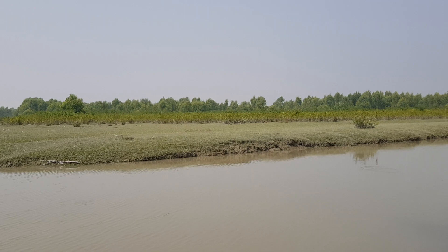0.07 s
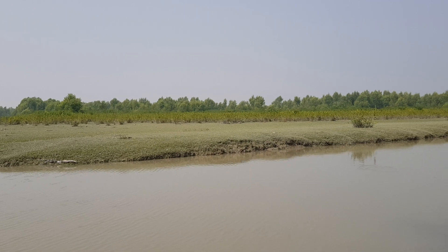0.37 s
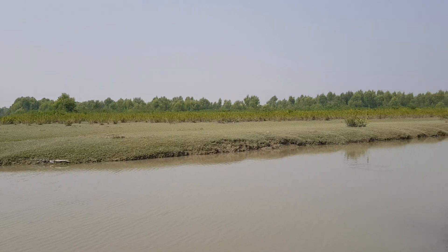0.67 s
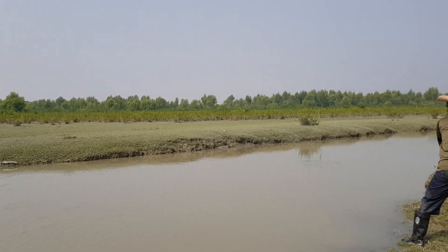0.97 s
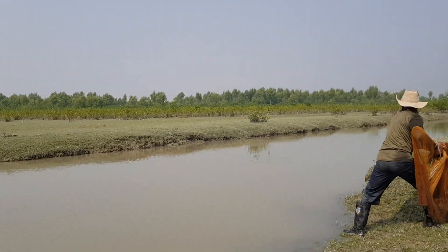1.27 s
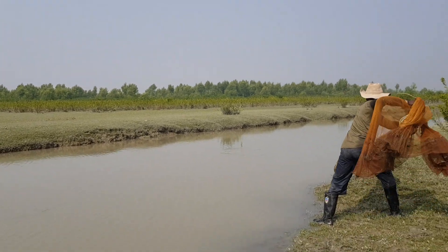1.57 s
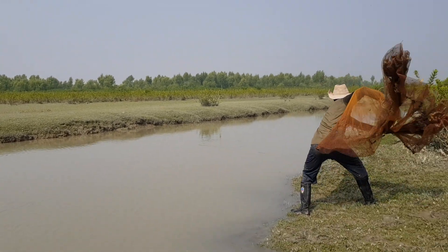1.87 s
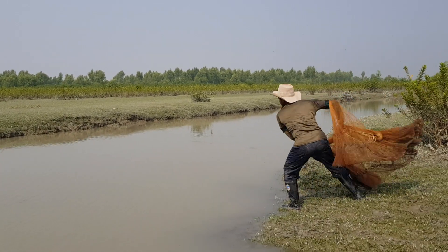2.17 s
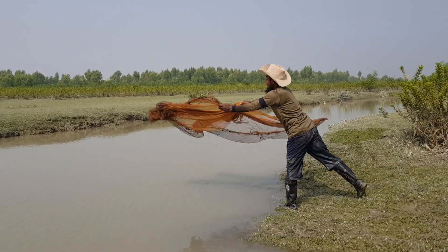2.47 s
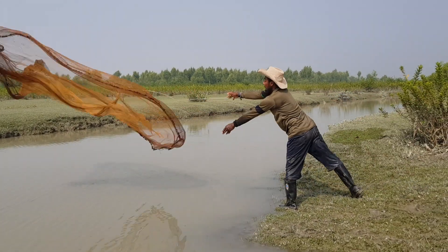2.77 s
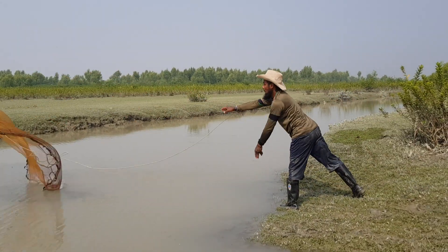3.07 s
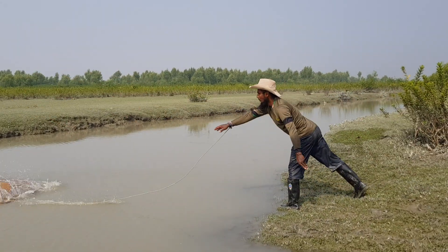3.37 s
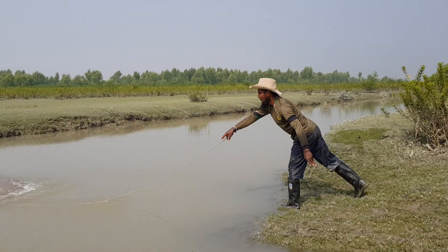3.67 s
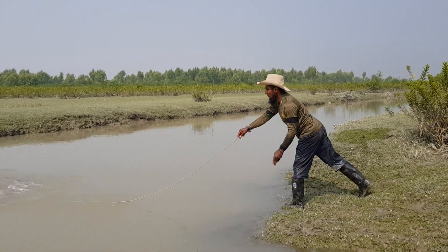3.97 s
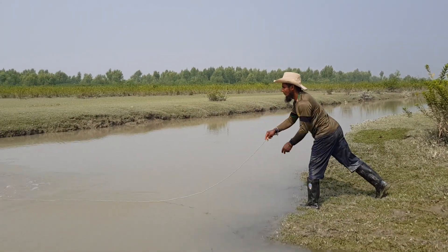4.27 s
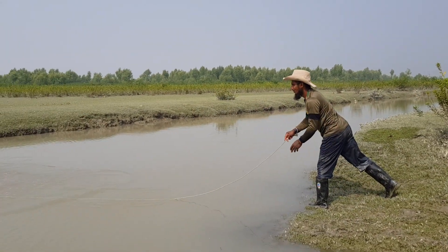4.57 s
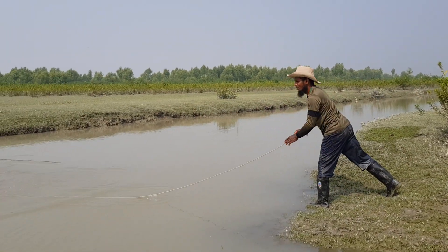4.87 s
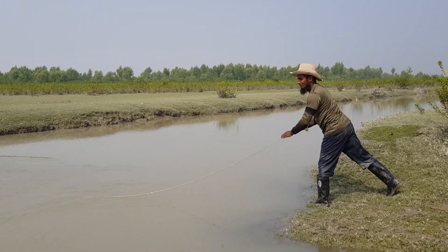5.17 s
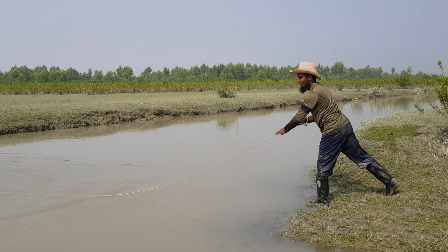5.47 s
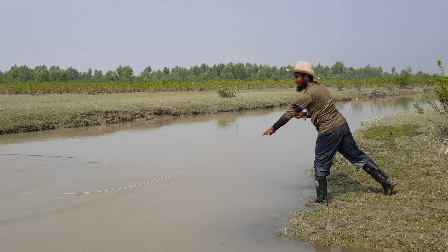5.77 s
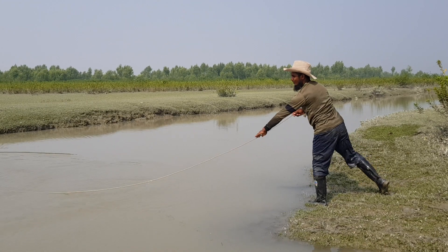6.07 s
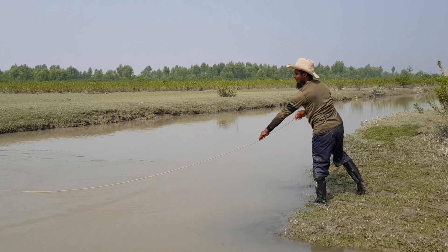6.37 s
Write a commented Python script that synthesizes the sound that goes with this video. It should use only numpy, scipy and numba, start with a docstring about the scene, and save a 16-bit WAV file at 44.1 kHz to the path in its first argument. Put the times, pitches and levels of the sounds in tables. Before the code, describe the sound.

High crickets chirp on both sides throughout, over the faint, even thudding of a distant boat engine and low wind rumble on the microphone. From about 1.3 seconds the small weights of a cast net click and jingle brightly, and again around 2.1 seconds, with rustling mesh and a few faint squelches of boots in mud. The net swishes through the air from right to left, peaking near 2.5 seconds, with more clicks. At about 3.1 seconds it hits the water in a broad splash of spray, plops and low gulps, strongest around 3.5 seconds. Drops rain back and bubbles fizz, fading by about 4.5 seconds. From 3.8 seconds stronger gusts buffet the microphone, mostly on the right, with a few soft thumps just after 6 seconds. The wind eases near 6.4 seconds, leaving the engine and faint insects.

```python
"""Crickets chirp, a one-cylinder boat engine thuds far off, and wind buffets the microphone.
Then a fisherman on a muddy canal bank swings a cast net: his boots squelch, the sinkers (small weights
on its rim) click together, and the mesh swishes out over the water from right to left.
It lands in a broad splash of spray, gulping air pockets and fizzing bubbles, and the water rains back."""
import sys
import numpy as np
from scipy import signal
from scipy.fft import rfft, irfft, next_fast_len
from scipy.io import wavfile
from scipy.ndimage import map_coordinates
from numba import njit

SR = 44100
rng = np.random.default_rng(int(sys.argv[2]) if len(sys.argv) > 2 else 0)


def master_out(mix):
    """Clip the mix to full scale and print it as 16-bit PCM to the path in sys.argv[1]."""
    frames = np.transpose(np.atleast_2d(mix))
    ceiling = np.clip(frames, -1, 1)
    pcm = np.round(ceiling * 32767).astype(np.int16)
    wavfile.write(sys.argv[1], SR, pcm)


N = 292383
TIME = np.arange(N) / SR


# The net's flight. Each row: time in seconds, milliseconds by which the left side hears it first.
NET_FLIGHT = [(2.2, -.15), (2.55, -0.0015), (2.75, .16)]
def net():
    """The net jingles and swishes as it crosses from right to left."""
    speed = net_speed()
    left, right = panned(jingle(speed) + swish(speed), left_db=-1.5)
    _, right = from_side(right, lead_ms=in_time(NET_FLIGHT)[0])
    return np.array([left, right])


def net_speed(swing_s=2.075, let_go_s=2.483, landing_s=3.1):
    """The net grows louder as it speeds up until it is let go, then fades as it slows in the air."""
    speeding_db = 19.5 * np.minimum(TIME - let_go_s, 0)
    slowing_db = -18 * np.maximum(TIME - let_go_s, 0)
    return from_db(speeding_db + slowing_db) * held(swing_s, landing_s, attack=0.0082, release=0.032)


# Sinkers knocking together, and one faint tick of the rope after the splash.
# Each row: start in seconds, ring level in dB, duller clack level in dB.
NET_CLICKS = [(1.3215, -32, -62), (1.398, -20.5, -36), (1.4163, -25, -44), (1.451, -25, -47),
              (1.461, -36, -44), (1.5206, -40, -50), (1.7744, -45, -58), (2.0607, -23.5, -46),
              (2.0684, -29, -48), (2.083, -20, -35), (2.168, -30, -35.5), (2.2762, -38, -40),
              (2.301, -35, -34), (2.3249, -41, -30), (2.53, -30, -45), (2.7126, -29, -30),
              (2.716, -24, -37), (2.8021, -31, -46), (3.1073, -28, -38), (5.1947, -52, -60)]
# The tone of sinkers and mesh. Each row: pitch in Hz, level in dB.
JINGLE_TONE = [(1600, -36), (2400, -15), (3300, -5.5), (6000, -6), (9000, 3), (12000, 5.5), (16000, -12)]
# Mesh dragged through the hands and shaken out. Each row: start and end in seconds, level in dB.
MESH_PULLS = [(1.397, 1.471, -52), (1.765, 1.83, -64), (2.025, 2.053, -60), (2.296, 2.322, -46.5),
              (2.508, 2.546, -52.5), (2.575, 2.67, -63), (2.75, 2.8, -60), (3.041, 3.06, -55)]
def jingle(speed):
    """Sinkers clack and rattle, the mesh rustles in the hands and in the air, and the rope ticks once."""
    clacks = sum(from_db(db) * burst(s, fade_s=.022, attack=.0001) for s, _, db in NET_CLICKS)
    rattles = sum(from_db(db - 26) * burst(s, fade_s=.09, attack=.003) for s, db, _ in NET_CLICKS)
    pulls = sum(from_db(db) * held(start, end, 0.0027, 0.052) for start, end, db in MESH_PULLS)
    rustle = speed ** 0.47 * from_db(-59.5 + 5.1 * drift(45))
    metal = grains(9000, JINGLE_TONE, cycles=5, rise=0, spread_db=1, lead_ms=0, width_ms=.05)
    mesh = grains(2000, JINGLE_TONE, cycles=7, rise=0, spread_db=3.2, lead_ms=0, width_ms=.15)
    sound = click_rings(NET_CLICKS) + clacks * metal + (rattles + pulls + rustle) * mesh
    return filtered(sound, 3, 2200, "high")


def click_rings(hits):
    """Each hit bounces for a few milliseconds, making a dozen short, high rings."""
    s, db, _ = np.repeat(hits, 12, axis=0).T
    pitch, lag = rng.random((len(s), 2)).T
    hz = 7500 + 8000 * pitch ** .8
    sizes = from_db(db - 6 - 4 * lag)  # later bounces are weaker
    rings = pings(s + .005 * lag ** 3, hz, sizes, cycles=30., rise=0., leads=np.zeros_like(s))
    return filtered(rings, 3, 5500, "high")


# The tone of air rushing through the mesh. Each row: pitch in Hz, level in dB.
SWISH_TONE = [(400, 13), (700, -1.5), (1000, 7), (1300, 1.5), (2500, 4), (4000, 0.5), (7000, -4.5),
              (16000, 1)]
def swish(speed):
    """The mesh cuts the air; part of the hiss arrives directly, the rest is scattered."""
    direct = from_db(-2.5) * noise(SWISH_TONE)[0]
    scattered = noise(SWISH_TONE)
    return from_db(-50.5) * speed * rms_one(direct + scattered)


# The tones of spray, plops and small bubbles. Each row: pitch in Hz, level in dB.
SPRAY_TONE = [(1500, -25), (3000, -1), (4500, 4), (6500, 3.5), (10000, 7.5), (13000, 8), (16000, 7)]
PLOP_TONE = [(2200, -3), (2800, -6.5), (3250, 5.5), (3800, 0), (4700, -0.5), (5400, -12), (6200, -7),
             (9000, -11)]
BUBBLE_TONE = [(700, 0.5), (1100, 1.5), (1500, 4.5), (1700, 0.5), (1900, 1.5), (2400, -0.5), (3000, 0),
               (4200, -10), (8000, -37)]
# Water slapping back down. Each row: start in seconds, level in dB.
WATER_SLAPS = [(3.1994, -49), (3.562, -23), (3.579, -23.5), (3.8088, -26), (3.851, -34), (4.0068, -40),
               (4.0597, -45), (4.126, -43.5)]
def splash():
    """The rim of sinkers plops in and tears the surface into spray; trapped air fizzes away."""
    spray = grains(11000, SPRAY_TONE, cycles=5.6, rise=0, spread_db=2, lead_ms=0.332, width_ms=0.062)
    plops = grains(2500, PLOP_TONE, cycles=25, rise=0.053, spread_db=1, lead_ms=0.306, width_ms=0.18)
    bubbles = grains(2500, BUBBLE_TONE, cycles=14, rise=0.29, spread_db=0, lead_ms=0.37, width_ms=0.17)
    spray_gain = landing(-32.5, attack=0.009, release=0.03) + rain_back(-47.5, 11, release=0.42)
    plop_gain = landing(-36.5, attack=0.032, release=0.025) + rain_back(-46, 30, release=0.34)
    bubble_gain = landing(-40.5, attack=0.024, release=0.067) + rain_back(-46, 9.5, release=0.14)
    slaps = sum(from_db(db - 10) * burst(s, fade_s=0.052, attack=0.0015) for s, db in WATER_SLAPS)
    water = air_pockets()
    water += spray_gain * from_db(0.81 * drift(35)) * clustered(spray, depth_db=2, per_s=22)
    water += (plop_gain * from_db(2.2 * drift(30)) + slaps) * clustered(plops, depth_db=3.5, per_s=14)
    water += (bubble_gain + slaps) * clustered(bubbles, depth_db=-0.5, per_s=13)
    return panned(with_bank_echo(water, delay_ms=2, share=.45), left_db=.2)


# Air pockets closing behind the sinkers. Each row: start in seconds, level in dB, first pitch in Hz.
POCKET_GULPS = [(3.209, -32.5, 508), (3.244, -27.5, 587), (3.265, -30, 576), (3.346, -24, 614),
                (3.425, -28, 550), (3.446, -23, 545), (3.488, -32.5, 625), (3.592, -32.5, 454),
                (3.659, -22, 647)]
# The tone of churning water. Each row: pitch in Hz, level in dB.
CHURN_TONE = [(150, -5), (280, -6), (420, -9.5), (590, -0.5), (790, -4.5), (980, -7), (1150, -2.5),
              (1400, -13)]
def air_pockets():
    """Trapped air churns; large pockets gulp, ringing low and rising a little as they near the top."""
    churn = grains(1200, CHURN_TONE, cycles=11, rise=0.14, spread_db=1.5, lead_ms=0.24, width_ms=0.093)
    churn_gain = landing(-37, attack=0.078, release=0.044) + rain_back(-46.5, 10.5, release=0.14)
    gulps = np.zeros(N)
    for s, db, hz in POCKET_GULPS:
        age = TIME - s
        ring = np.sin(2 * np.pi * hz * age * (1 + 2 * age))
        gulps += from_db(db + 3.5) * burst(s, fade_s=0.035, attack=0.0025) * ring
        churn_gain += from_db(db - 13.5) * burst(s, fade_s=0.1, attack=0.0046)
    return churn_gain * churn + from_side(gulps, lead_ms=0.19)


# The first sinkers land, then the near rim, then the rest.
# Each row: start and end in seconds, strength in dB.
LANDING_STAGES = [(3.102, 3.139, -6.5), (3.172, 3.42, -6), (3.42, 3.58, -1)]
def landing(db, attack, release):
    """The loudness of a water sound as the net hits the surface."""
    return sum(from_db(db + strength_db) * held(start, end, attack, release)
               for start, end, strength_db in LANDING_STAGES)


def rain_back(db, fade_db_per_s, release, start_s=3.6, end_s=4.002):
    """The loudness of a water sound as thrown-up water rains back and thins out."""
    faded_db = fade_db_per_s * np.maximum(TIME - start_s, 0)
    return from_db(db - faded_db) * held(start_s, end_s, 0.01, release)


def clustered(x, depth_db, per_s):
    """Clusters of like-sized bubbles come and go, so nearby pitches swell and fade together."""
    hz, s, frames = signal.stft(x, SR, nperseg=512)
    place = np.meshgrid(s * per_s, 6 * np.log2(1 + hz / 600))
    patches = map_coordinates(rng.standard_normal((400, 40)), place, order=1)
    _, sound = signal.istft(frames * from_db(depth_db * patches), SR)
    return rms_one(sound[:, :N])


def with_bank_echo(x, delay_ms, share):
    """A quick, dull bounce off the wet bank strengthens some low pitches and weakens others."""
    late = np.array([delayed(side, delay_ms) for side in x])
    return x + share * filtered(late, 1, 2600, "low")


# Squelches in the mud. Each row: middle in seconds, level in dB, pitch in Hz,
# pitch range as a share of the pitch, length in seconds.
MUD_SQUELCHES = [(1.168, -56.5, 1450, 1.4, 0.0035), (1.75, -61, 977, 0.32, 0.019),
                 (2.14, -49.5, 1430, 0.35, 0.0084), (2.143, -46.5, 1810, 0.084, 0.0064),
                 (2.174, -52.5, 1100, 0.29, .004)]
def boots():
    """Wet mud gives short, hollow squelches under the shifting feet."""
    out = np.zeros(N)
    for s, db, hz, width, length in MUD_SQUELCHES:
        edges_hz = [hz / (1 + width / 2), hz * (1 + width / 2)]
        squelch = filtered(rng.standard_normal(N), 2, edges_hz, "band")
        out += from_db(db) * swell(s, length) * rms_one(squelch)
    return from_side(out, lead_ms=-0.18)


# Gusts of wind. Each row: start and end in seconds, level in dB, how much louder on the left in dB.
WIND_GUSTS = [(0.235, 0.33, -41, -9), (0.74, 1.077, -48, 2), (1.302, 1.59, -39.5, 1),
              (1.709, 2.08, -38.5, 9), (2.49, 2.664, -43, -9), (2.924, 3.03, -41.5, -9),
              (3.425, 3.796, -39.5, -9), (3.805, 4.416, -27.5, -28), (4.441, 4.907, -32, -35),
              (4.931, 5.111, -25.5, -17), (5.17, 5.27, -29, -17), (5.478, 5.944, -38, -3.5),
              (5.741, 5.793, -28, -27), (5.945, 6.35, -28, -31), (6.569, 6.7, -37.5, 21)]
# Sudden swirls of air on the right. Each row: middle in seconds, level in dB, length in seconds.
WIND_SWIRLS = [(3.825, -26.5, 0.0065), (3.975, -31.5, 0.0098), (6.102, -25, 0.02), (6.143, -21, 0.005),
               (6.292, -21.5, 0.014), (6.342, -29.5, 0.012)]
# The tones of gust rumble, flutter, swirls and breeze. Each row: pitch in Hz, level in dB.
RUMBLE_TONE = [(15, -48), (28, -23), (48, 1.5), (70, 2.5), (105, -1.5), (160, -12.5), (250, -21),
               (400, -47.5), (800, -84.5), (2000, -96)]
FLUTTER_TONE = [(40, -14.5), (130, 12.5), (250, -2.5), (400, -18), (700, -48.5), (1500, -59), (3000, -102)]
SWIRL_TONE = [(45, -5), (90, -3), (150, 6.5), (250, -5), (400, -10.5), (700, -35.5), (1200, -57.5),
              (2500, -80)]
BREEZE_TONE = [(20, -24), (35, -1), (55, 1.5), (90, -2.5), (150, -8), (250, -21.5), (450, -46.5)]
def wind(attack=0.0088, release=.012, lull_s=6.36, strong_gust_db=-25):
    """Air rumbles on the microphone; strong gusts add a higher flutter, and swirls thump."""
    breeze = from_db(-43 + 1.2 * drift(21)) * held(-1, lull_s, attack, release)
    gusts = sum(panned(from_db(db) * held(start, end, attack, release), left_db)
                for start, end, db, left_db in WIND_GUSTS)
    pressure = gusts / from_db(strong_gust_db)
    rumble = from_db(-25.5) * pressure ** 0.83
    flutter = from_db(-35.5 + 3.3 * drift(30)) * pressure ** 1.59
    swirls = sum(from_db(db) * swell(s, length) for s, db, length in WIND_SWIRLS)
    return (rumble * noise(RUMBLE_TONE) + flutter * noise(FLUTTER_TONE)
            + swirls * noise(SWIRL_TONE) * [[.05], [1]] + breeze * noise(BREEZE_TONE))


# When the left and the right cricket sing. Each row: start and end in seconds, level in dB.
LEFT_SONG = [(-0.1, 0.34, -48.5), (0.35, 0.7, -56), (0.83, 1.53, -53), (1.68, 2.1, -57), (2.11, 2.98, -52),
             (3.06, 4.28, -55.5), (4.29, 5.45, -54.5), (5.58, 6.37, -56), (6.38, 6.7, -81)]
RIGHT_SONG = [(0.9, 1.65, -60.5), (2.02, 2.96, -63), (3.1, 3.96, -57), (4.3, 5.38, -59), (5.58, 6.7, -67)]
def crickets():
    """One cricket sits in the grass on each side, and more blur together behind them."""
    left = cricket(chirps_per_s=15.4, pitch_hz=8135, sag_hz=140, rasp=.12)
    right = cricket(chirps_per_s=15.9, pitch_hz=8110, sag_hz=110, rasp=.1)
    blur = noise([(7500, -35), (7850, 5), (8080, 17.5), (8280, 10.5), (8600, -34)])
    blur *= from_db(3.8 * drift(45))
    loudness = np.array([sum(from_db(db) * held(start, end, 0.0067, .025) for start, end, db in rows)
                         for rows in (LEFT_SONG, RIGHT_SONG)])
    song = loudness * (np.array([left, right]) + from_db(-7.5) * blur)
    return from_db(-2.5) * song + from_db(-66.5) * blur


def cricket(chirps_per_s, pitch_hz, sag_hz, rasp):
    """Each chirp is two wing strokes and a rest; the pitch sags within every stroke."""
    chirp = (chirps_per_s * TIME + 0.14 * drift(4.8)) % 1
    stroke = 3 * chirp
    loudness = np.sin(np.pi * stroke) ** 2 * (stroke < 2) * from_db(0.82 * drift(56))
    hz = pitch_hz + sag_hz * (.5 - stroke % 1) + 45 * drift(120)
    roughness = 1 + rasp * drift(400)
    return rms_one(loudness * roughness * np.sin(2 * np.pi * np.cumsum(hz) / SR))


# The boat engine's pace. Each row: time in seconds, firings per second.
ENGINE_PACE = [(0, 12.87), (2.8, 12.87), (3.4, 13.1), (4.2, 12.93), (6.63, 12.93)]
# The tones of its thud and its knock. Each row: pitch in Hz, level in dB.
THUD_TONE = [(40, 1), (80, 6.5), (125, 7.5), (175, -4.5), (208, 0), (250, -11), (310, -8.5), (350, -25.5),
             (400, -19), (520, -25), (700, -54.5), (950, -51), (1400, -57), (3000, -56)]
KNOCK_TONE = [(200, 19), (330, 3), (450, 5.5), (560, -5), (720, -24), (1000, -12.5), (1400, -28),
              (3000, -37)]
def engine():
    """Each firing is a dull thud with a knock, followed by the same scatter of echoes off the banks."""
    cycles = np.cumsum(in_time(ENGINE_PACE)[0]) / SR - .39
    firings = np.diff(np.floor(cycles), prepend=-1) * from_db(2 * drift(13))
    scatter = rng.standard_normal((3, SR // 4)) * from_db(-60 * TIME[:SR // 4] / 0.3)
    banks = scatter[0] + .5 * scatter[1:]  # a shared part, plus one for each side
    echoes = signal.fftconvolve(firings[None], banks, axes=1)[:, :N]
    thuds = coloured(firings, THUD_TONE) + from_db(3) * coloured(echoes, THUD_TONE)
    knock_gain = np.exp(-((cycles + .03) % 1) / .1)
    knocks = coloured(knock_gain * rng.standard_normal(N), KNOCK_TONE)
    return panned(from_db(-50.5) * thuds + from_db(-61) * knocks, left_db=2.5)


# The tones of far insects and open air. Each row: pitch in Hz, level in dB.
INSECT_TONE = [(2300, -48), (2600, -7.5), (2800, -0.5), (3150, -14), (4400, -18), (4900, -3.5), (5750, 3.5),
               (6350, -4.5), (6800, 1), (7700, 1), (8600, 5), (9100, -14.5)]
AIR_TONE = [(100, 19), (600, 9), (950, 8), (1300, 2), (2500, 0), (4200, -6.5), (9000, -0.5), (12000, 4.5),
            (16000, 1.5)]
def marsh():
    """Far insects sing on the right, the air hisses softly, and a faint drone sits on the left."""
    insects = from_db(-67) * noise(INSECT_TONE) * from_db(0.88 * drift(3.4))
    air = from_db(-67.5) * noise(AIR_TONE)
    drone = from_db(-62) * noise([(340, -9), (390, -0.5), (450, -19.5)])
    return panned(insects, left_db=-35) + air + panned(drone, left_db=18)


def grains(per_s, tone, cycles, rise, spread_db, lead_ms, width_ms):
    """A steady shower of tiny clicks, drops or bubbles of random pitch, size and direction."""
    when, pitch, size, place = rng.random((int(per_s * N / SR), 4)).T
    low_hz, high_hz = tone[0][0], tone[-1][0]
    hz = low_hz * (high_hz / low_hz) ** pitch
    signs = np.sign(np.sin(np.arange(len(hz)) + 1))
    sizes = signs * hz * from_db(spread_db * np.minimum(-np.log(1 - size), 4))
    leads = (lead_ms + width_ms * (2 * place - 1)) / 1000
    return coloured(pings(when * N / SR, hz, sizes, float(cycles), float(rise), leads), tone)


@njit
def pings(starts, hz, sizes, cycles, rise, leads):
    """Short notes that die away, each from its own direction; rise bends their pitch upward."""
    out = np.zeros((2, N))
    for k in range(len(starts)):
        life = cycles / hz[k]
        for side in range(2):
            start = starts[k] + side * leads[k]
            for i in range(max(int(start * SR) + 1, 0), min(int((start + life) * SR), N)):
                age = i / SR - start
                wave = np.sin(2 * np.pi * hz[k] * age * (1 + rise * age / life))
                out[side, i] += sizes[k] * np.exp(-6.9 * age / life) * wave
    return out


def coloured(x, tone):
    """Shape a sound with a tone table, fading pitches beyond its ends; the power comes out as 1."""
    size = next_fast_len(N)
    hz, db = np.transpose(tone)
    log_hz = np.log(np.arange(1, size // 2 + 2) * SR / size)
    beyond = np.maximum(np.log(hz[0]) - log_hz, 0) + np.maximum(log_hz - np.log(hz[-1]), 0)
    shape = from_db(np.interp(log_hz, np.log(hz), db) - 40 * beyond)
    return rms_one(irfft(rfft(x, size) * shape, size)[..., :N])


def noise(tone):
    """Noise with the given tone, separate on the left and right."""
    return coloured(rng.standard_normal((2, N)), tone)


def filtered(x, order, hz, kind):
    """Keep the lows, the highs or a band; a higher order cuts more steeply."""
    return signal.sosfilt(signal.butter(order, hz, kind, fs=SR, output="sos"), x)


def drift(per_s):
    """A random wander of typical size 1 that heads for a new value per_s times a second."""
    points = rng.standard_normal(4000)
    return rms_one(np.interp(TIME * per_s, np.arange(len(points)), points))


def burst(s, fade_s, attack):
    """The loudness of a blow at s seconds: a quick rise, then a fall of 60 dB in fade_s."""
    out, start = np.zeros(N), int(s * SR)
    age = TIME[:min(N - start, SR // 2)]
    out[start:start + len(age)] = (1 - np.exp(-age / attack)) * from_db(-60 * age / fade_s)
    return out


def swell(s, length):
    """The loudness of a soft push: a smooth hump centred on s seconds."""
    return np.exp(-.5 * ((TIME - s) / length) ** 2)


def held(start, end, attack, release):
    """Loudness that rises at start and fades after end; attack and release say how slowly, in seconds."""
    rise = 1 - np.exp(-np.maximum(TIME - start, 0) / attack)
    return rise * np.exp(-np.maximum(TIME - end, 0) / release)


def panned(x, left_db):
    """Share a sound between the sides, with the left louder by left_db."""
    ratio = from_db(left_db)
    return x * np.array([[ratio], [1]]) * np.sqrt(2 / (1 + ratio ** 2))


def from_side(x, lead_ms):
    """A sound from the left reaches the left microphone first."""
    return np.array([x, delayed(x, lead_ms)])


def delayed(x, ms):
    """The same sound, ms milliseconds later."""
    return np.interp(TIME - ms / 1000, TIME, x)


def in_time(rows):
    """Join a table's rows with straight lines, giving a value at every sample."""
    s, *columns = np.transpose(rows)
    return [np.interp(TIME, s, column) for column in columns]


def from_db(db):
    """Turn decibels into a number to multiply by."""
    return 10 ** (np.asarray(db) / 20)


def rms_one(x):
    """Scale a sound so its average power is 1."""
    return x / np.sqrt(np.mean(x ** 2) + 1e-20)


def scene():
    """The throw and the splash in front of the open marsh."""
    return net() + boots() + splash() + crickets() + engine() + wind() + marsh()


def record(dry):
    """The microphone drops the deepest rumble and steeply cuts the highest treble."""
    heard = filtered(dry, 2, 30, "high")
    return signal.sosfilt(signal.ellip(10, .2, 70, 15900, fs=SR, output="sos"), heard)


dry = scene()
out = record(dry)
master_out(out)
```